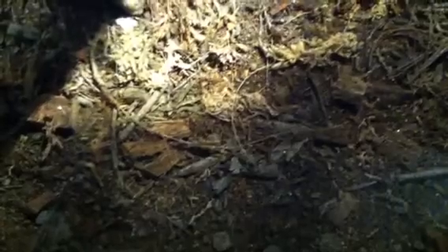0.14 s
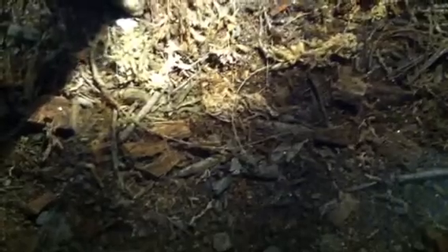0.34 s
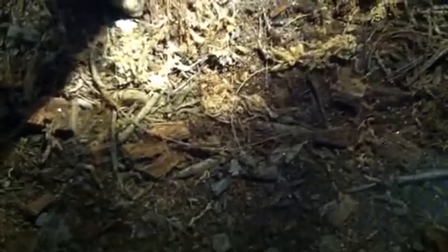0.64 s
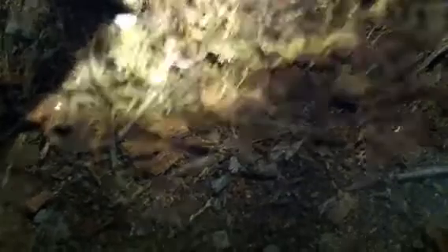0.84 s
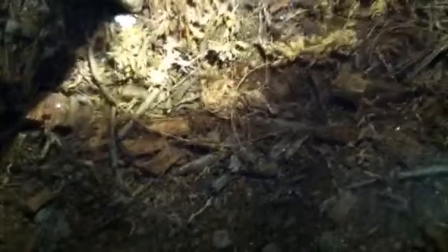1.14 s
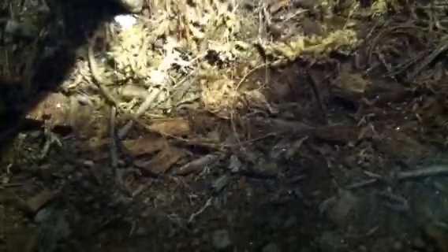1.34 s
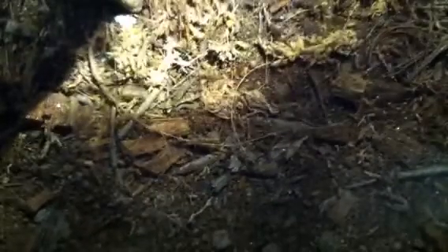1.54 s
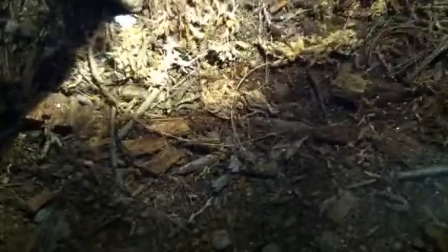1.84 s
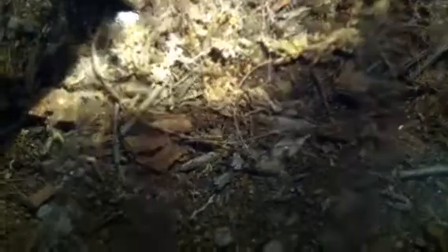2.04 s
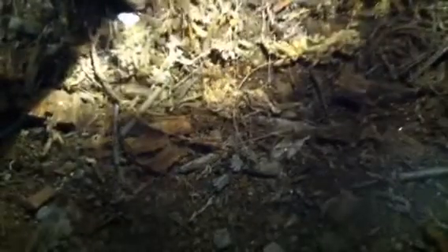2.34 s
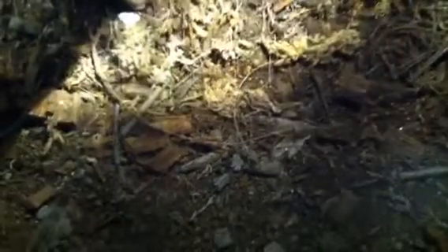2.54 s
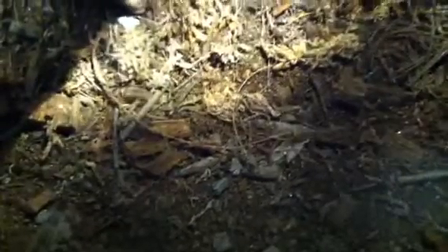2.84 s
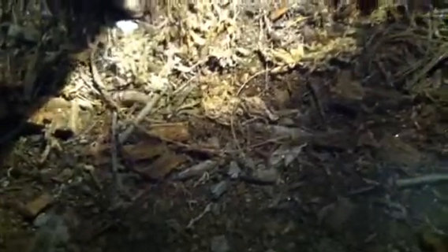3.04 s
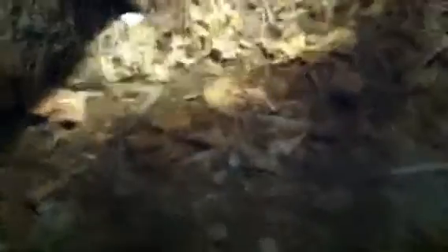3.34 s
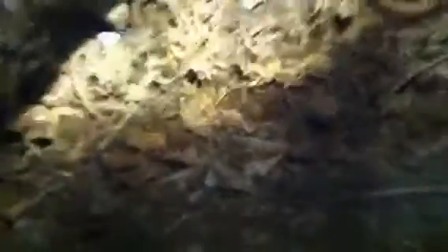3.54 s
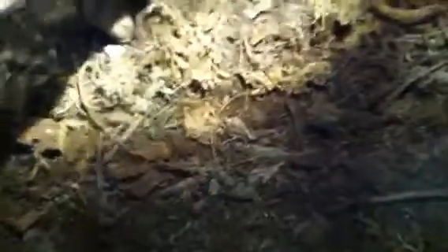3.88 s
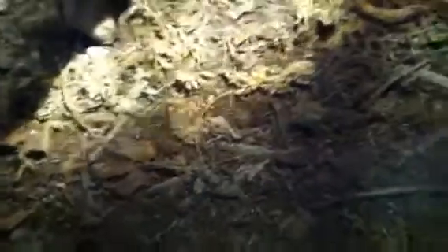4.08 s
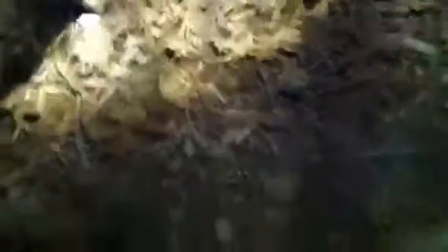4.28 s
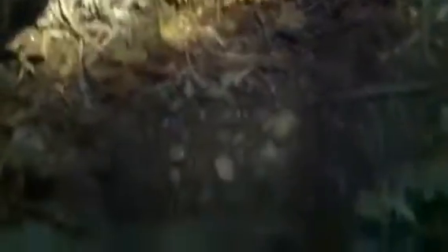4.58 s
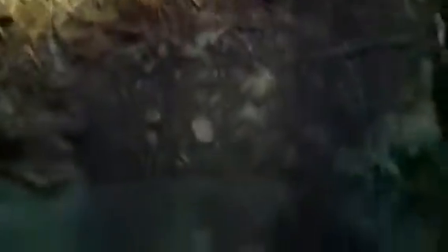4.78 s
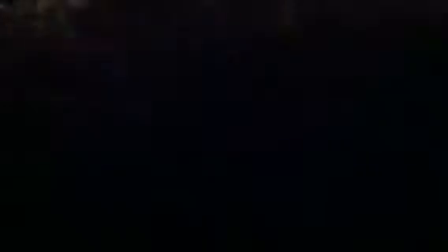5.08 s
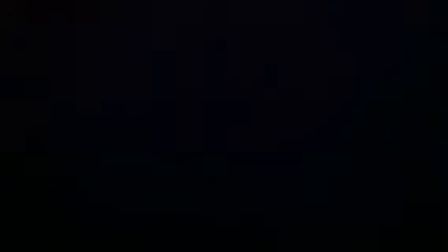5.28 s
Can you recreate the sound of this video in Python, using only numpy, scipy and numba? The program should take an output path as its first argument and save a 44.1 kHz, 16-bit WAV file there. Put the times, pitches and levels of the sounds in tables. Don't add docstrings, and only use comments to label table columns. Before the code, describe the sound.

A hand handles a small plastic camera over soil and moss in a quiet room. Light taps and dry rustles come first, with a knock near half a second. A sharp crackling creak hits at two seconds, a denser run follows just past three, and the loudest bunch comes at five. Very close microphone with little deep bass; a faint pump hums and trickles behind.

```python
import sys
import numpy as np
from scipy import signal
from scipy.fft import rfft, irfft
from scipy.io import wavfile
from scipy.ndimage import uniform_filter1d, minimum_filter1d
from numba import njit

SR = 44100
rng = np.random.default_rng(int(sys.argv[2]) if len(sys.argv) > 2 else 0)


def bounce(signal):
    frames = np.transpose(np.atleast_2d(signal))
    limited = np.clip(frames, -1, 1)
    pcm = np.round(limited * 32767).astype(np.int16)
    wavfile.write(sys.argv[1], SR, pcm)


def invert_db(x):
    u = np.asarray(x, float) / 20
    return 10 ** u


N = 238845

# frequency in Hz, density in dB per Hz.
ROOM_COLOUR = [(25, -16.5), (60, -29), (95, -12), (125, -3.5), (190, -6), (300, -20), (600, -21.5),
               (1100, -25), (1750, -28.5), (3300, -28.5), (4500, -30), (5200, -39.5), (8200, -34.5),
               (11000, -44)]
# pitch in Hz, wander in Hz, level in dB.
PUMP = [(218.5, 2, -62), (2150, 12, -80)]
# centre in Hz, width in Hz, level in dB.
TRICKLE = [(1068, 170, -74.5), (1630, 150, -79), (2200, 70, -77), (2640, 110, -80), (3234, 110, -77),
           (3940, 150, -80.5), (4290, 150, -76), (4550, 110, -78)]

# centre in Hz, width in Hz, level in dB.
BODY = [(54, 64, -9), (146.5, 90, -1.5), (263, 130, -1.5), (401, 182, -5)]
# centre in Hz, width in Hz, level in dB.
PANEL = [(750, 510, 4), (1200, 1130, -2.5), (1695, 1700, 0.5)]
# centre in Hz, width in Hz, level in dB.
SHELL = [(2500, 1000, -13), (3544, 990, -11.5), (4460, 730, -1.5), (5600, 330, -9.5)]
# centre in Hz, width in Hz, level in dB.
FIBRE = [(6040, 820, 1), (7550, 3580, -0.5), (10633, 12000, -20.5)]
# centre in Hz, width in Hz, level in dB.
MOSS = [(2430, 2740, 0.5), (3440, 620, 3), (3800, 1080, -0.5), (4780, 220, 2.5)]
# centre in Hz, width in Hz, level in dB.
SCUFF = [(804, 210, -2), (1142, 120, -9), (1450, 19, -5.5), (1783, 89, -20)]
# centre in Hz, width in Hz, level in dB.
FLAT = [(803, 230, 3), (1050, 520, -6), (1450, 460, -3.5)]
# centre in Hz, width in Hz, level in dB.
PING = [(4175, 38, 5), (4590, 120, 2), (6200, 140, -5)]

# time in seconds, force in dB, weight in dB.
RUSTLE = [(0, -69.5, -3), (.55, -63, 5.5), (.72, -58, 1.5), (.95, -56.5, -12.5), (1.3, -58, -13),
          (1.55, -58.5, -11), (1.68, -62, -8.5), (1.75, -63.5, -8), (1.9, -56, -4.5), (2.0, -58, -1.5),
          (2.3, -56, -7.5), (2.6, -63.5, -1.5), (2.87, -62, -2), (3.3, -61, 0.5), (3.5, -52.5, 10.5),
          (3.74, -95, 12), (4.3, -62, 3), (4.6, -71.5, -3), (5.0, -66.5, -7.5), (5.42, -81, -2)]
# time in seconds, centre in Hz, width in Hz.
BRUSH = [(0, 7100, 2570), (.8, 7950, 2530), (0.95, 8550, 2100), (1.1, 8400, 2266), (1.25, 8200, 2590),
         (1.38, 7900, 2004), (1.53, 8700, 2004), (1.62, 8550, 4010), (1.72, 8700, 2402), (1.85, 8050, 3000),
         (2.2, 7910, 3565), (2.5, 7700, 3740), (4.402, 7400, 2860), (5.2, 7140, 4880), (5.42, 7650, 4000)]
# start in seconds, length in seconds, force in dB, weight in dB.
STROKES = [(.088, 0.12, -81, 22), (.59, .038, -79, 8.5), (.627, 0.071, -76.5, 26.5), (.714, 0.26, -63, 0),
           (.845, 0.039, -48.5, -2.5), (.948, 0.1, -55.5, 8), (1.131, 0.026, -51, -2.5),
           (1.432, 0.068, -57, -8.5), (1.585, 0.091, -86.5, -29.5), (1.808, 0.079, -51.5, -2.5),
           (2.11, 0.1, -62.5, 13.5), (2.233, .042, -64, 14), (2.39, 0.15, -60.5, -5.5),
           (2.462, 0.2, -53, 0.5), (2.717, 0.028, -61.5, -4), (3.52, 0.058, -56, 9), (3.634, 0.12, -61, 3),
           (3.955, 0.059, -67, -2.5), (4.342, 0.089, -56.5, 0.5), (2.25, 0.033, -70, -19),
           (2.735, 0.056, -70, -8), (4.1, 0.043, -57.5, 4), (5.15, 0.16, -56.5, -9),
           (5.256, 0.39, -55, 1.5)]
# start in seconds, length in seconds, force in dB, weight in dB.
GRIPS = [(.862, 0.036, -36.5, -25), (.905, 0.042, -41.5, -0.5), (1.152, 0.15, -46.5, -3.5),
         (2.054, 0.068, -28, -6), (2.293, 0.05, -40.5, -7), (3.192, 0.054, -29.5, -22),
         (3.25, 0.051, -36.5, -9), (3.394, 0.06, -30, -3.5), (3.453, 0.029, -39, 10.5),
         (3.564, 0.069, -35, -5), (5.018, 0.056, -28.5, -14), (5.062, 0.031, -32, -18),
         (5.086, 0.028, -30, 0), (5.107, 0.22, -43, -17.5), (5.232, 0.034, -36, -19)]
# start in seconds, length in seconds, level in dB.
DRAGS = [(0.63, 0.027, -60), (0.923, 0.039, -53), (1.165, 0.056, -46), (2.304, 0.043, -45),
         (2.453, 0.16, -49.5), (4.07, 0.049, -61), (4.228, 0.053, -41), (4.352, 0.041, -46.5),
         (5.115, .1, -67), (5.26, 0.12, -50.5), (5.304, 0.18, -47.5)]
# start in seconds, length in seconds, centre in Hz, width in Hz, level in dB.
WHISPERS = [
    (.2, .11, 3350, 250, -71),
    (.325, .06, 6000, 5000, -68),
    (.66, .3, 3000, 650, -60),
    (1.425, .07, 4400, 900, -59),
    (1.425, .07, 6800, 2600, -58),
    (1.45, .045, 2200, 1800, -57),
    (2.455, .025, 10500, 3000, -60),
    (5.14, .105, 4680, 300, -48),
]

# start in seconds, peak in dB, pitch in Hz.
TAPS = [(0.1017, -36.5, 296), (0.151, -37.5, 344), (0.512, -26, 905), (0.608, -38, 834), (.648, -30.5, 413),
        (0.661, -32.5, 690), (0.669, -32, 494), (0.73, -34, 636), (0.786, -38.5, 506), (0.9465, -25.5, 287),
        (1.138, -38, 880), (1.167, -26, 1070), (1.19, -24, 563), (1.245, -32.5, 990), (1.7801, -31, 970),
        (2.131, -27.5, 275), (2.236, -28.5, 795), (2.255, -34, 1200), (2.492, -36, 1030),
        (2.527, -32, 1040), (2.586, -29, 744), (2.7477, -33, 680), (2.806, -29, 840), (2.98, -34.5, 274),
        (3.2496, -35, 750), (0.85, -39, 700), (0.96, -32, 590), (0.983, -44, 420), (3.532, -35.5, 496),
        (3.593, -22, 517), (4.246, -27, 820), (5.1099, -19.5, 890), (5.243, -24, 660), (3.5683, -22.5, 655),
        (4.2573, -26.5, 450), (4.08, -29, 403), (2.075, -14, 566), (0.655, -57, 600), (0.679, -40, 420),
        (4.368, -47, 950), (4.384, -44.5, 1200), (5.118, -17.5, 750), (5.172, -45, 760), (5.197, -39, 760),
        (5.226, -28, 1450), (5.237, -23, 428), (5.262, -29, 700), (5.305, -45, 800), (5.35, -32.5, 300),
        (5.369, -45, 1440), (5.401, -40, 790)]
# start in seconds, peak in dB, pitch in Hz.
KNOCKS = [(0.4817, -19, 960), (.8712, -35, 510), (0.905, -26, 345), (0.9235, -28, 680),
          (1.1745, -24.5, 590), (1.8263, -24.5, 1620), (2.0561, -14.5, 990), (2.0566, -13, 685),
          (2.0649, -18.5, 676), (2.0868, -17, 407), (2.3764, -23, 1040), (2.9591, -27, 910),
          (3.1836, -21, 473), (3.199, -15, 630), (3.2042, -16.5, 320), (3.2549, -24, 215),
          (3.398, -17.5, 530), (3.4005, -13.5, 255), (3.4202, -18.5, 910), (3.457, -17.5, 590),
          (3.618, -26.5, 552), (4.0755, -27, 777), (4.2331, -17, 1450), (4.3466, -30.5, 1200),
          (5.018, -17, 517), (5.027, -36, 646), (5.0583, -9, 390), (5.0855, -11.5, 653),
          (5.0964, -17.5, 724), (5.145, -25, 354)]
# start in seconds, peak in dB, brightness in dB.
SNAPS = [(.482, -24, -11), (0.5118, -30.5, -17.5), (0.868, -21, -9.5), (0.9175, -30.5, -10),
         (1.1373, -38, -20), (1.168, -30, -13), (1.191, -32, -12), (1.5675, -36.5, -9.5),
         (1.684, -44.5, -9), (1.7764, -28, -5.5), (1.8226, -23.5, -4.5), (1.8472, -45, 2),
         (1.9053, -38, -12), (2.2576, -46, -4), (2.169, -40, -20), (2.305, -35.5, 0), (2.31, -35.5, -1),
         (2.5293, -49, -23), (2.8083, -40.5, -7.5), (2.961, -33.5, -15.5), (3.056, -49, 1.5),
         (3.185, -38.5, -7), (3.264, -25.5, -12.5), (3.275, -28.5, -16.5), (3.316, -35, -18),
         (3.368, -43.5, -7), (3.527, -38, -10.5), (3.964, -41.5, -13), (4.079, -33.5, -10.5),
         (4.0829, -29, -21.5), (4.1838, -40.5, -18), (4.236, -26.5, -12), (4.243, -22, -12.5)]
# start in seconds, peak in dB, brightness in dB.
CREAKS = [(2.0558, -28, -10), (2.065, -19, -11), (2.0705, -10, -12), (2.087, -13, -11), (2.104, -29, -19),
          (2.081, -8.5, -14), (2.091, -12, -10), (2.098, -10, -12.5), (2.1115, -21.5, -32),
          (3.2028, -12, -19), (3.198, -31.5, -14), (3.214, -10, -10), (3.2155, -6.5, -9.5),
          (3.2182, -18, -3), (3.2268, -25, -6.5), (3.402, -8.5, -17.5), (3.4058, -12, -26),
          (3.4145, -22.5, -8), (3.4254, -20.5, -17), (3.4628, -23, -14), (3.421, -17, -4),
          (3.429, -2, -7.5), (3.439, -8.5, -13), (3.446, -12.5, -15), (3.4708, -23, -27),
          (3.5686, -18.5, -18), (3.5785, -9, -12), (3.5854, -10, -16), (3.588, -17, -25),
          (3.5948, -11, -14.5), (3.6002, -20, -19), (3.597, -5.5, -11.5), (3.606, -15.5, -15.5),
          (3.6114, -12, -17), (5.02, -35, -6), (5.027, -19, -5.5), (5.0305, -2, -13), (5.0346, -12, -9),
          (5.0376, -13, -14), (5.0425, -24, -5), (5.065, -21, -8), (5.047, -13, -20), (5.0686, -8.5, -7),
          (5.0748, -4.5, -14), (5.0897, -13, -17), (5.0918, -15, -5), (5.0969, -8, -12),
          (5.1009, -11, -6.5), (5.105, -12, -17), (5.238, -22, -20), (5.2443, -14, -18.5)]
# start in seconds, peak in dB, pitch in Hz, ring T60 in ms.
THUDS = [(0.483, -18.5, 220, 10.3), (0.662, -35, 197, 54), (0.869, -28.5, 222, 134), (0.918, -28, 232, 44),
         (0.987, -39, 164, 150), (1.175, -34, 179, 37), (2.067, -44, 180, 43), (2.087, -39, 186, 190),
         (2.963, -30.5, 258, 59), (3.185, -24.5, 160, 68), (3.204, -14.5, 171, 39), (3.255, -11, 156, 19),
         (3.399, -10, 159.2, 88), (3.457, -21.5, 180, 55), (3.57, -25.5, 156, 130),
         (3.589, -23.5, 147.5, 170), (3.629, -31.5, 132, 200), (4.0761, -20.5, 207, 21),
         (4.24, -22.5, 201, 26), (4.256, -26.5, 201, 25), (4.352, -40.5, 186, 100), (5.02, -26, 212, 29),
         (5.061, -20.5, 215, 52), (5.087, -30, 214, 96), (5.141, -37, 193, 33)]
# start in seconds, peak in dB, pitch in Hz, ring T60 in ms.
PLUCKS = [(0.922, -29.5, 922, 75), (1.216, -37.5, 1014, 170), (1.236, -40, 956, 120), (1.238, -44, 747, 80),
          (1.256, -45.5, 395, 350), (2.378, -29.5, 1050, 59), (3.2505, -22, 727, 35),
          (4.235, -21, 1474, 25), (4.241, -27, 1120, 30), (4.346, -29, 1170, 20), (5.021, -20, 292, 116),
          (5.143, -26.5, 289, 67), (5.196, -39, 817, 90), (5.368, -41.5, 1390, 83)]
# time in seconds, peak in dB, pitch in Hz.
JABS = [(0.61, -43, 1500), (.6608, -29, 595), (.669, -35, 600), (.851, -39, 790), (1.4325, -45, 5000),
        (1.7775, -28, 2200), (1.8235, -28, 1700), (2.254, -41, 1300), (2.3785, -35, 1520),
        (2.4657, -32, 4500), (2.486, -38, 2200), (2.4937, -35, 2500), (2.5095, -37, 1800),
        (2.528, -30, 2400), (2.5885, -40, 1300), (2.722, -41, 1000), (2.9612, -27.5, 1520),
        (3.0605, -42, 1500), (3.1846, -27, 1200), (3.1985, -12.5, 1000), (3.372, -39, 892),
        (3.375, -45, 1900), (3.3985, -26, 1300), (3.4212, -13, 1300), (3.4568, -17, 900),
        (3.6202, -27, 1200), (4.0757, -22, 750), (4.136, -48, 4500), (4.235, -21, 1510),
        (5.0984, -15, 4000), (5.2428, -19, 4500)]
# frequency in Hz, floor in dB under the
MASK_FLOOR = [(1000, -70), (3000, -57), (6000, -60.5), (9000, -37.5), (12000, -29.5), (16000, -36.5)]


def unit(x):
    return x / np.sqrt(np.mean(x ** 2))


def band(x, hz, width):
    return signal.lfilter(*signal.iirpeak(hz, hz / width, fs=SR), x)


def ring(x, modes):
    return sum((-1) ** k * invert_db(db) * band(band(x, hz, width), hz, width)
               for k, (hz, width, db) in enumerate(modes))


def walk(rate):
    hold = int(SR / rate)
    steps = np.repeat(rng.standard_normal(N // hold + 1), hold)
    return 2.0 * uniform_filter1d(uniform_filter1d(steps, hold), hold)[:N]


def grit(spread_db, patchy_db, rate):
    size_db = spread_db * np.minimum(rng.exponential(size=N), 6.5)
    return rng.standard_normal(N) * invert_db(size_db + patchy_db * walk(rate))


def add(out, piece, s):
    i = int(s * SR)
    out[i:i + len(piece)] += piece[:N - i]


def room(level_db=-57, top_db=-14):
    hz, db = np.transpose(ROOM_COLOUR)
    f = np.maximum(np.arange(N // 2 + 1) * SR / N, 1)
    colour = np.interp(np.log(f), np.log(hz), db)
    colour += top_db * np.maximum(np.log2(f / hz[-1]), 0) * 2
    air = irfft(rfft(rng.standard_normal(N)) * invert_db(colour), N)
    hum = np.zeros(N)
    for pitch, wander, db in PUMP:
        phase = 2 * np.pi * np.cumsum(pitch + wander * walk(20.0)) / SR
        hum += invert_db(db + 6.5 + 0.4 * walk(28)) * np.sin(phase)
    return invert_db(level_db + 0.76 * walk(4.3)) * unit(air) + hum


def trickle(flicker_db=2.5, rate=9):
    return sum(invert_db(db + flicker_db * walk(rate)) * unit(band(rng.standard_normal(N), hz, width))
               for hz, width, db in TRICKLE)


@njit
def sweep(x, hz, width):
    y, b, l = np.empty(len(x)), 0., 0.
    for i in range(len(x)):
        g, k = np.tan(np.pi * hz[i] / SR), width[i] / hz[i]
        v = (b + g * (x[i] - l)) / (1 + g * (g + k))
        b, l, y[i] = 2 * v - b, l + 2 * g * v, k * v
    return y


def brush(air_db=-10):
    s, *shape = np.transpose(BRUSH)
    hz, width = (np.interp(np.arange(N) / SR, s, c) for c in shape)
    air = ring(grit(1.6, 2.0, 41), [(11000, 5500, 0)]) * width / 3000
    hiss = sweep(sweep(grit(0.86, 0.9, 45), hz, width), hz, width)
    return unit(unit(hiss) + invert_db(air_db) * unit(air))


def layers_db(force_db, weight_db, offset_db, share):
    return [force_db + o + k * weight_db for o, k in zip(offset_db, share)]


def stroke_power(length, attack=0.11, release=0.087):
    u = np.arange(int(2 * length * SR)) / SR / length
    return np.minimum(u / attack, 1) ** 2 / (1 + np.exp((u - .8) / release)) ** 2


def friction(hard_db=-50):
    # offset in dB, then dB per dB of weight
    grip_law = (5, -1.5, -3, -5.5), (0.58, -0.13, 0.11, 0.15)
    stroke_law = (5, -1.5, -2, -2.5), (1, -0.45, -0.99, -1.12)
    rustle_law = (5, -1.5, -4.5, -9.5), (0.54, 0, -0.48, -0.72)

    soft, hard, drag = np.zeros((4, N)), np.zeros((4, N)), np.zeros(N)
    for rows, law in ((GRIPS, grip_law), (STROKES, stroke_law)):
        for start, length, force_db, weight_db in rows:
            levels = layers_db(force_db, weight_db, *law)
            shape = stroke_power(length)
            hard_share = 1 / (1 + invert_db(hard_db - levels[2]) ** 2)
            for k, db in enumerate(levels):
                add(hard[k], hard_share * invert_db(2 * db) * shape, start)
                add(soft[k], (1 - hard_share) * invert_db(2 * db) * shape, start)
    for start, length, db in DRAGS:
        add(drag, invert_db(2 * db) * stroke_power(length), start)
    s, *slow = np.transpose(RUSTLE)
    soft += [invert_db(2 * np.interp(np.arange(N) / SR, s, c)) for c in layers_db(*slow, *rustle_law)]

    coarse = [ring(grit(0.4, 1.0, 40), BODY), ring(grit(5.13, 0.6, 90), PANEL),
              ring(grit(1.7, 1.5, 150), SHELL), ring(grit(1.4, 1.5, 150), FIBRE)]
    scuff = grit(2.8, 1.5, 110)
    moss = grit(1.8, 1.2, 80)
    fine = [ring(grit(1.0, 1.0, 30), BODY), ring(scuff, SCUFF) + 2.0 * ring(scuff, PANEL),
            ring(moss, MOSS), brush()]
    out = np.sqrt(drag) * unit(ring(scuff * invert_db(0.76 * walk(41)), FLAT))
    for h, c, d, f in zip(hard, coarse, soft, fine):
        out += np.sqrt(h) * unit(c) + np.sqrt(d) * unit(f)
    return out


def knocks(spread=1.24, loss_db=13, buzz_db=-5, wood_db=-6, knock_t60_ms=56, tap_t60_ms=33.3):
    t = np.arange(3072) / SR
    out = np.zeros(N)
    rise = 1 - np.exp(-(t / .0005) ** 2)
    rows = [(*r, knock_t60_ms) for r in KNOCKS] + [(*r, tap_t60_ms) for r in TAPS]
    for s, db, hz, t60_ms in rows:
        wood = invert_db(wood_db) * np.sin(2 * np.pi * 2.2 * hz * t)
        swing = (np.sin(2 * np.pi * hz * t) + wood) * invert_db(-loss_db * hz * t)
        loose = unit(ring(rng.standard_normal(3072), [(hz, spread * hz, 0)]))
        buzz = loose * invert_db(buzz_db - 60000 * t / max(t60_ms, 4))
        add(out, invert_db(db - 0.5) * rise * (swing + buzz), s)
    return out


def whisper():
    t = np.arange(N) / SR
    out = np.zeros(N)
    for s, length, hz, width, db in WHISPERS:
        swell = np.sqrt(np.sin(np.pi * np.clip((t - s) / length, 0, 1)).clip(0))
        out += invert_db(db) * swell * unit(ring(rng.standard_normal(N), [(hz, width, 0)]))
    return out


def slips(crack_s=.0002, fade_s=0.00081, ping_db=2, tail_db=-14, mid_db=-12, crumble=0.4):
    creak_t60_ms, snap_t60_ms = 25, 53.8
    snap_full_db, snap_ms_per_db = -27.5, 2.5
    t = np.arange(3072) / SR
    shell, fibre = np.zeros(N), np.zeros(N)
    crack = 1.66 * (1 - np.exp(-(t / crack_s) ** 2)) * np.exp(-t / fade_s)
    rows = [(*r, creak_t60_ms) for r in CREAKS]
    rows += [(*r, snap_t60_ms + snap_ms_per_db * min(r[1] - snap_full_db, 0)) for r in SNAPS]
    for s, db, bright_db, t60_ms in rows:
        noise = rng.standard_normal(3072)
        start_db = min(tail_db + crumble * (t60_ms - 20), -2)
        tail = invert_db(start_db - 60000 * t / max(t60_ms, 6)) * np.minimum(t / crack_s / 2, 1)
        even = np.sqrt(np.sum(crack ** 2) / np.sum((noise * crack) ** 2))
        snap = noise * crack * even + noise * tail
        add(shell, invert_db(db) * snap, s - 2 * crack_s)
        add(fibre, invert_db(db + bright_db) * snap, s - 2 * crack_s)
    ping = sum(invert_db(db) * band(shell, hz, width) for hz, width, db in PING)
    out = invert_db(ping_db) * ping + invert_db(8.5) * ring(shell, SHELL)
    return out + invert_db(10.5) * ring(fibre, FIBRE) + invert_db(mid_db) * ring(shell, PANEL)


def thuds(rise_s=0.00033, sag=0.069, sag_s=0.023):
    t = np.arange(9000) / SR
    out = np.zeros(N)
    for s, db, hz, t60_ms in THUDS + PLUCKS:
        phase = 2 * np.pi * hz * (t + sag * sag_s * (1 - np.exp(-t / sag_s)))
        level = invert_db(db - 0.5 - 60000 * t / t60_ms) * (1 - np.exp(-t / rise_s))
        add(out, level * np.sin(phase), s)
    return out


def jabs():
    out = np.zeros(N)
    for s, db, hz in JABS:
        u = np.pi * np.sqrt(2) * hz * (np.arange(256) - 128) / SR
        add(out, -invert_db(db) * np.sqrt(2 * np.e) * u * np.exp(-u ** 2), s - 128 / SR)
    return out


def tank(x, dull_t60=0.22, dull_db=-13, bright_t60=0.058, bright_db=-14, split_hz=1800):
    t = np.arange(8192) / SR
    noise = rng.standard_normal(8192) * np.minimum(t / 0.0013, 1)
    dull = signal.lfilter(*signal.butter(2, split_hz, fs=SR), noise)
    echo = invert_db(dull_db - 60 * t / dull_t60) / np.sqrt(dull_t60) * dull
    echo += invert_db(bright_db - 60 * t / bright_t60) / np.sqrt(bright_t60) * (noise - dull)
    return x + signal.fftconvolve(x, echo * np.sqrt(2 * np.log(1000) / SR))[:N]


def scene():
    background = room() + trickle()
    contact = tank(friction() + knocks() + slips() + jabs())
    return (background + contact + whisper() + thuds())[None, :]


def mask(x):
    f, _, z = signal.stft(x, SR, nperseg=256, noverlap=128)
    power = uniform_filter1d(np.abs(z) ** 2, size=5, axis=0)
    peak = -minimum_filter1d(-power[f > 2600].max(axis=0), size=11)
    hz, db = np.transpose(MASK_FLOOR)
    floor = peak * invert_db(2 * np.interp(f, hz, db))[:, None]
    keep = 1 / (1 + (floor / (power + 1e-18)) ** 4)
    return signal.istft(z * keep, SR, nperseg=256, noverlap=128)[1][:N]


def low_pass(x):
    return signal.sosfilt(signal.butter(12, 15960, fs=SR, output="sos"), x)


def record(dry, end_s=5.416):
    fade_out = np.clip((end_s - np.arange(N) / SR) / 0.0017, 0, 1)
    x = np.tanh(0.99 * dry) / 1.246 * fade_out
    x = signal.sosfilt(signal.butter(4, 118, "high", fs=SR, output="sos"), x) + invert_db(-18.0) * x
    x = signal.sosfilt(signal.butter(4, 13300, fs=SR, output="sos"), x)
    x = mask(x[0])[None, :]
    x = signal.sosfilt(signal.ellip(8, .2, 60, 15900, fs=SR, output="sos"), x)
    return low_pass(x)


dry = scene()
out = record(dry)
bounce(out)
```